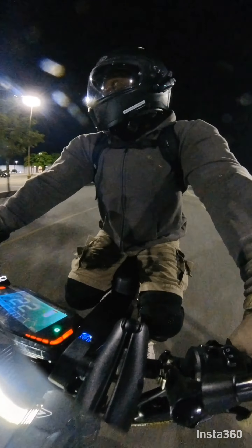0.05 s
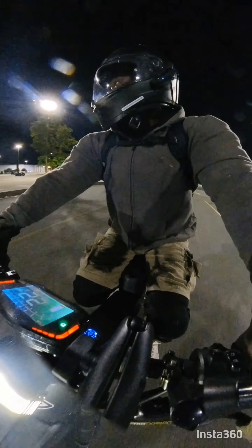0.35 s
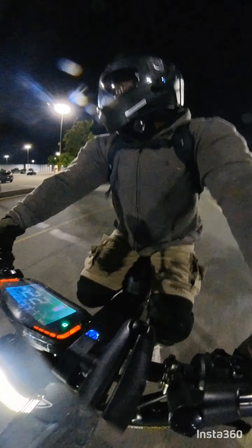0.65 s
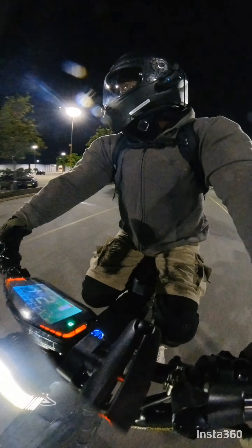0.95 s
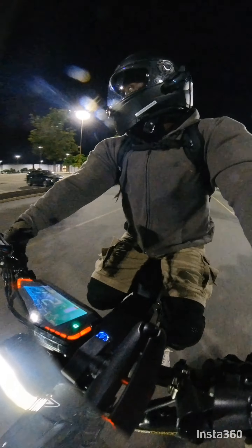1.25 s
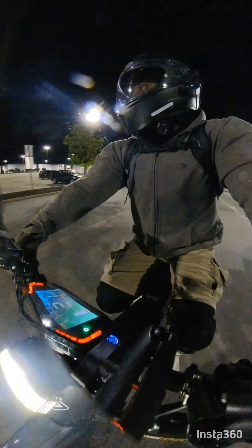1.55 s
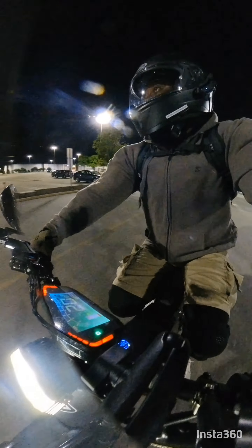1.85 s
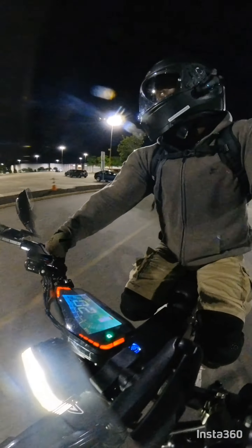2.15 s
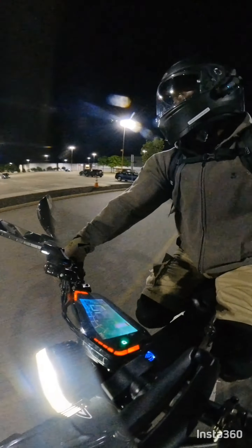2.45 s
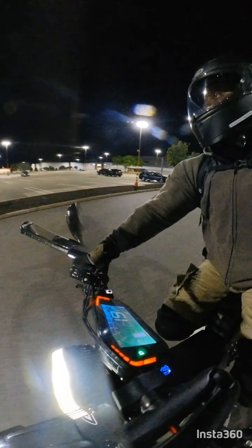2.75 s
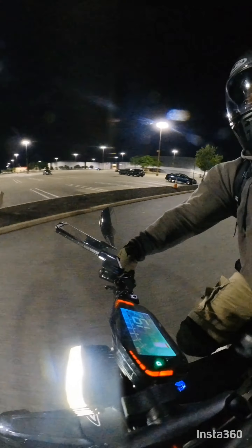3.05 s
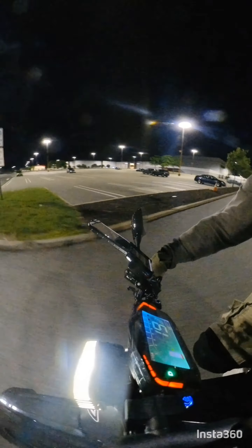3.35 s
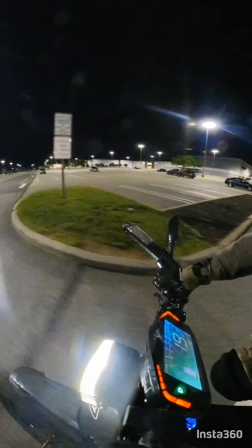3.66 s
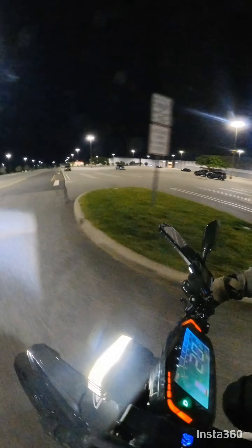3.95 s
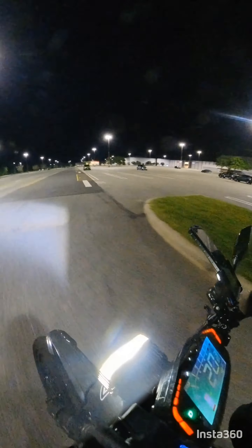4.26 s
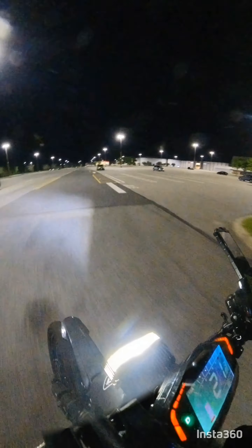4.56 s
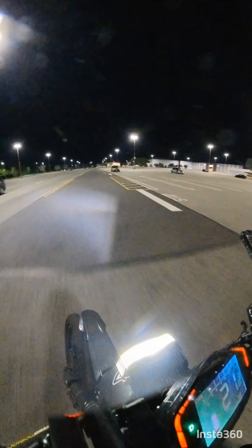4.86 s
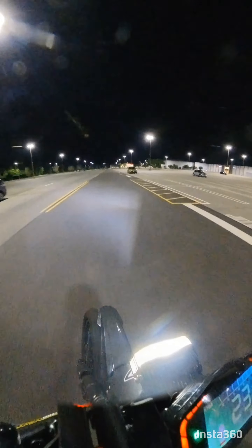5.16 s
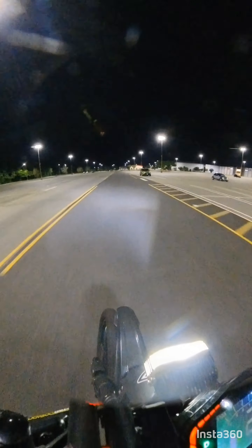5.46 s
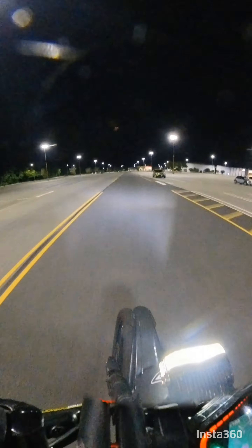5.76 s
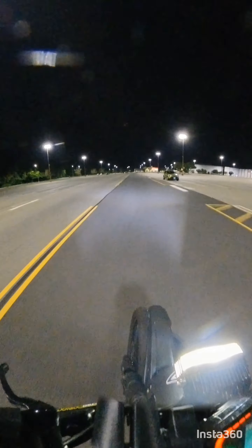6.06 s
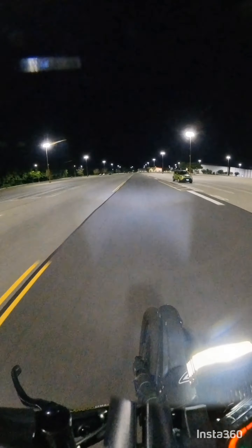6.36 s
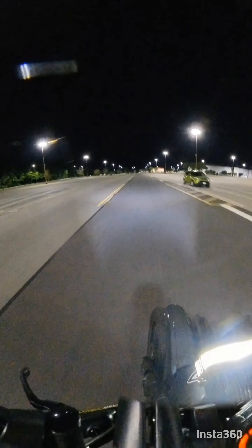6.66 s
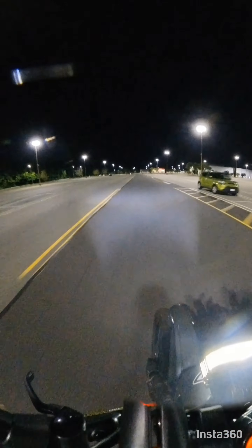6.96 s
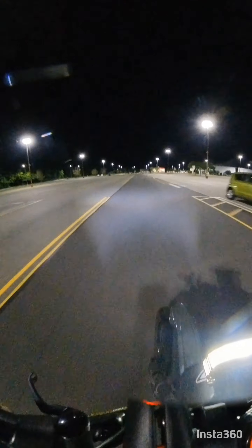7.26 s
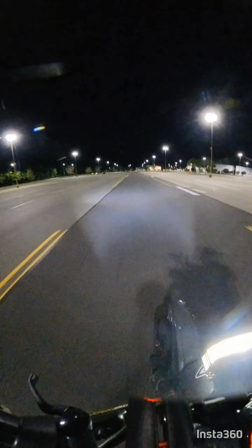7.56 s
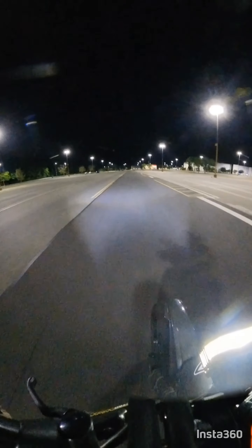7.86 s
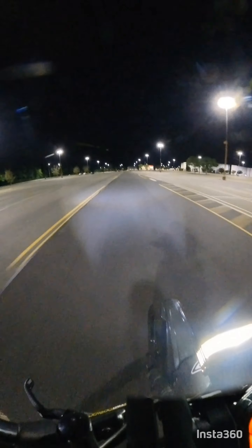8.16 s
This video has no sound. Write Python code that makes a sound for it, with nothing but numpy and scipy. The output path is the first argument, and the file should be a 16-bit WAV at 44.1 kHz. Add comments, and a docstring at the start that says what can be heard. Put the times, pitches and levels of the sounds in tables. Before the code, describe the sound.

Heavy wind rumbles on a handlebar microphone while an electric motorbike rolls along with a low, wavering hum and a dull bump from the road. A sharp double knock ends the coasting, another thump follows, and the bike accelerates, its hum climbing and turning into a rough whine. Loose fittings click lightly along the way, and the rush of tyres and air grows with the speed.

```python
"""Electric motorbike from the handlebar

On an open road, microphone on the handlebar, close to the motor and full in the wind. The motor hums
and ticks as the bike coasts through a bend; the frame takes two hard knocks; a second later the drive
pulls and rises in a rough whine. Thumps and rattles come up from the road, and wind buffets the
microphone over the rush of tyres and air."""
import sys
import numpy as np
from scipy import signal
from scipy.fft import rfft, irfft, next_fast_len
from scipy.io import wavfile
from scipy.ndimage import uniform_filter1d

SR = 44100
rng = np.random.default_rng(int(sys.argv[2]) if len(sys.argv) > 2 else 0)


def bounce(signal):
    """Save signal as a 16-bit WAV file at the path given by the first command-line argument."""
    frames = np.transpose(np.atleast_2d(signal))
    limited = np.clip(frames, -1, 1)
    pcm = np.round(limited * 32767).astype(np.int16)
    wavfile.write(sys.argv[1], SR, pcm)


N = 362502
TIME = np.arange(N) / SR
DRAG_ENDS_S, PULL_STARTS_S, CRUISE_HZ = 2.84, 3.88, 160

# Levels in the tables are relative; each source sets its own gain.
# motor speed as the pitch of its hum: t/s, f/Hz
HUM_PITCH = [(0, 133), (.75, 129.8), (1, 126.2), (1.75, 122.7), (2, 120.6), (2.5, 117.1), (3.25, 117.9),
             (3.5, 116.3), (3.75, 117), (4.25, 130.6), (4.5, 132.2), (4.75, 147.6), (5.75, 194.8),
             (6.25, 213.8), (7, 243.2), (7.5, 258.3), (8.22, 289)]
# drag on the coasting motor, twice easing abruptly: t/s, level/dB
COASTING_DRAG = [(0, 1), (0.585, 1.5), (0.61, -19), (0.73, -14), (0.79, -11.5), (1.1, -2), (1.56, -3),
                 (1.62, -11), (1.85, -11), (2.25, -23), (2.62, -15.5), (2.78, -12)]
# coasting overtones: multiple of the hum, level/dB
DRAG_OVERTONES = [(2.5, 0.5), (4, 1), (4.5, -18.5), (5, -2), (5.5, -3.5), (6, -6), (6.5, -11.5), (7, -13.5),
                  (9, -19.5)]
# wavers in the motor tone: t/s, half length/s, hum/dB, octave/dB, third order/dB
TONE_WAVERS = [(.79, 0.14, -5, 2.5, -10), (1.8, 0.48, 2, 2, 9), (2.67, 0.13, -0.5, 5, 5),
               (2.9, 0.09, -31.5, -2, 4), (3.15, .15, -1, 3, -5.5), (3.45, 0.13, 0, -7.5, 3),
               (3.73, 0.099, -9, -0.5, 1.5), (4.3, 0.2, -7.5, 3.5, 1), (6.38, 0.065, -0.5, -14, 4),
               (6.65, 0.11, 3, 6, 2.5)]
# chassis resonances that the low orders sweep through: f/Hz, width/Hz, level/dB
CHASSIS_MODES = [(119.7, 5.1, 1), (131.9, 1.7, -4), (157.3, 14, -5.5), (220.5, 14.7, -12), (251, 1, -18.5),
                 (387.5, 17, -2), (480, 49, -22.5), (700, 8.3, -1.5)]
# response of the motor casing: f/Hz, level/dB
CASING_RESPONSE = [(300, -4), (390, 2), (415, -3), (455, 2), (505, -2), (560, 3), (605, 2.5), (640, 9),
                   (660, 0), (688, 1.5), (750, -16), (840, -10.5), (900, -1.5), (1000, -2.5), (1110, 0),
                   (1320, -4), (1700, 1), (1950, -4.5), (2280, -0.5), (3000, -10)]
# load on the drive, heard as whine: t/s, level/dB
DRIVE_LOAD = [(0, -75.5), (4, -64.5), (5.5, -54.5), (6.25, -48.5), (6.55, -43.5), (7.2, -41.5),
              (7.7, -39.5), (8.22, -40)]
# whine orders, some in beating pairs: multiple of the hum, level/dB, width/Hz, steady share of power
WHINE_ORDERS = [(1.06, 10, 22, 0.2), (1.96, 5, 9.2, 1), (2.03, 0, 14, 0.3), (2.85, -1.5, 12, 0.7),
                (3.02, -3, 15, 0.4), (3.9, -7, 18, 0.5), (4.07, -5.5, 13, 0.7), (4.9, -14, 35, 0.3),
                (6.15, -14.5, 22, 0.4), (7.2, -18, 20, 0.2), (8.25, -17, 22, 0.25), (9.1, -18.5, 36, 0.05),
                (10, -21, 83, 0.05)]
# shrill order and its smeared sidebands: multiple of the hum, level/dB, width/Hz
SHRILL_CLUSTER = [(26.2, -10.5, 200), (29.3, -1, 92), (30.6, -3.5, 230), (31.8, -9.5, 350)]
# spectrum of the meshing rasp: f/Hz, level/dB
RASP_SPECTRUM = [(400, -17.5), (650, 9.5), (780, 2), (1000, 8.5), (1500, -6.5), (1950, -5.5), (2300, -4.5),
                 (2750, -10.5), (3200, -17.5), (6000, -41.5)]
# knocks on the frame: t/s, level/dB, contact/s, thud/dB, blow f/Hz, blow width/Hz, rebound/dB
FRAME_KNOCKS = [(2.8042, -10.5, 0.0028, -17, 630, 450, -32), (2.9335, -4.5, 0.0042, -9, 655, 220, -9)]
# parts chattering at a knock: delay/s, level/dB
CONTACT_CHATTER = [(0, 6), (.004, -3), (.007, -16), (.013, -11), (.019, -17)]
# spectrum of a knock's first contact: f/Hz, level/dB
CRACK_SPECTRUM = [(400, 12.5), (1000, 23.5), (1700, 4.5), (2300, 8), (3100, 5.5), (3800, 7), (4700, -7),
                  (5600, 0), (6800, 2), (8000, -3), (9200, 4.5), (11500, -11)]
# ringing modes of the frame: f/Hz, level/dB, t60/s
FRAME_MODES = [(416, -6, 0.057), (566, -1, 0.017), (653, -21, 0.15), (667, -29, 0.017), (1020, -24, 0.084),
               (1095, -44, 0.0387), (1640, -21, 0.025)]
# jolts through the fork: t/s, level/dB
FORK_JOLTS = [(0.587, -7), (2.651, -32), (3.801, -16.5)]
# clicks of loose fittings: t/s, level/dB
FITTING_CLICKS = [(.067, -43), (.573, -44), (.584, -46), (0.608, -42), (.803, -40), (1.03, -48),
                  (1.561, -42.5), (1.595, -48), (2.343, -46), (2.59, -49.5), (2.719, -41), (3.178, -40.5),
                  (3.45, -50), (3.522, -47), (4.061, -43), (4.099, -44.5), (4.141, -46), (4.221, -47),
                  (4.291, -46), (4.361, -45), (4.811, -37.5), (5.026, -41), (5.912, -37)]
# gusts and lulls at the microphone: t/s, half length/s, level/dB
WIND_GUSTS = [(.2, 0.21, -1), (.605, 0.027, 5.5), (.71, 0.062, -2), (1.4, 0.41, -2.5), (2.05, 0.36, -1.5),
              (3.79, 0.06, 6.5), (5.2, 0.26, -1)]
# resonances of the microphone mount: f/Hz, width/Hz, level/dB
MOUNT_MODES = [(27.43, 10, -7.5), (73.67, 7.9, -2)]
# spectrum of eddies on the microphone: f/Hz, level/dB
BUFFET_SPECTRUM = [(15, -33), (24, -14.5), (38, -9.5), (55, 0.5), (72, -17.5), (95, -8), (118, 0.5),
                   (160, -5), (200, -7), (270, -14), (340, -24.5), (600, -44.5), (1200, -70.5)]
# spectrum of the rush of tyres and air: f/Hz, level/dB
RUSH_SPECTRUM = [(100, -26), (200, 2.5), (310, 0.5), (395, 5), (470, -2.5), (690, -2.5), (790, -13),
                 (1000, -15), (1200, -18), (1450, -21), (1600, -28), (2200, -41.5), (3000, -45),
                 (6000, -76.5)]
# spectrum of the hiss above it: f/Hz, level/dB
HISS_SPECTRUM = [(500, -5.5), (1500, 9.5), (2400, 6), (3200, 0), (3800, 1.5), (5200, -2), (6800, 0),
                 (8400, 3), (9500, -1.5), (11500, -10)]


def motor(hum_hz, phase, drag):
    """Low orders swell across chassis resonances, shaken slightly by the road; drag adds overtones."""
    hum_db, octave_db, third_db = [swells(TONE_WAVERS, column) for column in range(3)]
    hum = from_db(-15.5 + hum_db + 0.54 * drift(26)) * chassis_gain(hum_hz) * np.sin(phase)
    octave = from_db(octave_db + 1.8 * drift(18)) * np.sin(2 * phase + 0.22 * drift(20))
    octave_push = from_db(-26 + 11.5 * until(PULL_STARTS_S)) + from_db(26.5) * drag
    octave *= octave_push * chassis_gain(2 * hum_hz)
    third = from_db(third_db + 2.2 * drift(15)) * np.sin(3 * phase + 0.35 * drift(15))
    third *= np.hypot(from_db(-41) * chassis_gain(3 * hum_hz), from_db(3.5) * drag)
    overtones = 0
    for order, db in DRAG_OVERTONES:
        gain = from_db(db + 2.2 * drift(13)) * casing_gain(order * hum_hz)
        overtones += gain * np.sin(order * phase + 0.7 * drift(5.5))
    return np.sqrt(2) * (hum + octave + third + drag * overtones)


def whine(hum_hz, phase, drag, load, shrill_full_hz=265):
    """Uneven meshing roughens the drive's orders and rasps between them; a shrill one grows with speed."""
    mesh = 0
    for order, db, width_hz, steady in WHINE_ORDERS:
        clean = np.sqrt(2 * steady) * np.sin(order * phase)
        rough = np.sqrt(1 - steady) * rough_line(order * phase, width_hz)
        mesh += from_db(db) * casing_gain(order * hum_hz) * (clean + rough)
    rasp_gain = from_db(-1.5) * load + from_db(-13.5) * drag
    rasp = rasp_gain * turbulence(RASP_SPECTRUM, patchy_db=1.5, flutter_hz=21)
    shrill = sum(from_db(db) * rough_line(order * phase, width) for order, db, width in SHRILL_CLUSTER)
    shrill_db = -52 - 0.8 * np.maximum(shrill_full_hz - hum_hz, 0) + 3.1 * drift(57)
    return load * mesh + rasp + from_db(shrill_db) * rms_one(shrill)


def controller_whistle():
    """The controller whistles faintly, a little louder while the motor drags."""
    level_db = -76 + 1.5 * until(DRAG_ENDS_S) + drift(8)
    return from_db(level_db) * rms_one(band(rng.standard_normal(N), 8550, 9000))


def ticking(phase):
    """One thin tick every second cycle of the hum while the motor drags."""
    ticks = np.diff(np.floor(phase / (4 * np.pi)), prepend=0)
    strength = drag_gain(-30, follows=0.13) * from_db(1.7 * rng.standard_normal(N))
    return band(ticks * strength, 7600, 9700)


def knocks():
    """A bright, chattering contact, then a double blow that rings the frame, rebounds lower and thuds."""
    crackle = turbulence(CRACK_SPECTRUM, patchy_db=2.5, flutter_hz=17)
    blows, impacts = 0, 0
    for start, db, contact_s, thud_db, blow_hz, width_hz, rebound_db in FRAME_KNOCKS:
        chatter = sum(from_db(contact_db) * burst(start + delay, 0.3 * contact_s)
                      for delay, contact_db in CONTACT_CHATTER)
        crack = from_db(db - 21.5) * (chatter + from_db(-16) * burst(start, 0.0073)) * crackle
        blow = from_db(db) * (np.arange(N) == round((start + 0.002 + contact_s / 2) * SR))
        second_blow = from_db(-5) * np.roll(blow, round(SR / blow_hz))
        blows += resonance(blow + second_blow, blow_hz, width_hz)
        rebound = from_db(rebound_db) * thump(start + 0.0105, hz=470, decay_s=0.00086)
        thud = from_db(thud_db) * thump(start + 0.013, hz=116, decay_s=0.0035)
        impacts += crack + rebound + thud
    return impacts + sum(from_db(db + 4.5) * ring(blows, hz, t60) for hz, db, t60 in FRAME_MODES)


def fork_thumps():
    """Each jolt sends one dull thump up the fork."""
    return sum(from_db(db) * thump(start, hz=73.4, decay_s=0.013) for start, db in FORK_JOLTS)


def rattles(pace, grains_per_s=70, grain_decay_s=0.0034):
    """Loose fittings click over bumps; road grit patters in faint flurries, harder with speed."""
    clicks = sum(from_db(db - 12) * burst(start, 0.0022) for start, db in FITTING_CLICKS)
    hits = rng.random(N) < grains_per_s * from_db(2 * drift(3)) / SR
    grains = hits * from_db(-58.5 + 8 * pace + 2.6 * rng.standard_normal(N))
    grit = signal.lfilter([1], [1, -np.exp(-1 / (grain_decay_s * SR))], grains + 1e-18)
    fittings = band(clicks * rng.standard_normal(N), 1500, 6900)
    return fittings + band(grit * rng.standard_normal(N), 2800, 5000)


def wind_buffet(hum_hz, pace, gust_db, full_hz=136.4):
    """Eddies pound the microphone; the faster the ride, the more of that goes into rocking its mount."""
    level_db = -21 - 0.214 * np.maximum(full_hz - hum_hz, 0) + gust_db
    rocking = sum(from_db(db) * rough_line(2 * np.pi * hz * TIME, width) for hz, width, db in MOUNT_MODES)
    eddies = turbulence(BUFFET_SPECTRUM, patchy_db=1.8, flutter_hz=30)
    return from_db(level_db) * (from_db(4.4 * pace) * rocking + from_db(-1.5 - 2.4 * pace) * eddies)


def road_rush(pace, gust_db, drag, load, gust_share=0.29):
    """Tyres and air rush and hiss behind it all, growing with speed, gusts and strain on the drive."""
    hiss = turbulence(HISS_SPECTRUM, patchy_db=1.2, flutter_hz=60)
    hiss_strain = from_db(-23.5) * drag + from_db(-11.5) * load
    hiss *= np.hypot(from_db(-66 + 8 * pace + gust_share * gust_db), hiss_strain)
    rush = turbulence(RUSH_SPECTRUM, patchy_db=1.13, flutter_hz=18)
    rush_strain = from_db(7.5) * drag + from_db(1.5) * load
    rush *= np.hypot(from_db(-35.5 + 4.5 * pace + gust_share * gust_db), rush_strain)
    return rush + hiss


def chassis_gain(pitch_hz):
    """How strongly the chassis radiates a tone of this pitch."""
    power = sum(from_db(db) ** 2 / (1 + (2 * (pitch_hz - hz) / width) ** 2)
                for hz, width, db in CHASSIS_MODES)
    return np.sqrt(power)


def casing_gain(pitch_hz):
    """How strongly the motor casing radiates an overtone of this pitch."""
    return from_db(np.interp(pitch_hz, *np.transpose(CASING_RESPONSE)))


def drag_gain(level_db, follows):
    """Gain that follows a share of the drag's swings in dB and stops when the drag lets go."""
    return from_db(level_db + follows * in_time(COASTING_DRAG)) * until(DRAG_ENDS_S)


def turbulence(spectrum, patchy_db, flutter_hz):
    """Coloured noise whose octaves flutter partly together, partly alone; rms 1."""
    points_hz, points_db = np.transpose(spectrum)
    size = next_fast_len(N)
    octave = np.log2(np.maximum(np.arange(size // 2 + 1) * SR / size, 1))
    colour = from_db(np.interp(octave, np.log2(points_hz), points_db, left=-120, right=-120))
    noise = rfft(rng.standard_normal(size)) * colour
    together, mix = drift(flutter_hz), 0
    for centre in range(int(np.log2(points_hz[0])), int(np.log2(points_hz[-1])) + 2):
        part = irfft(noise * np.maximum(1 - np.abs(octave - centre), 0), size)[:N]
        mix += part * from_db(patchy_db * (together + drift(flutter_hz)))
    return rms_one(mix)


def rough_line(phase, width_hz):
    """A tone whose strength and phase wander, smearing it into a narrow band; rms 1."""
    return drift(width_hz) * np.sin(phase) + drift(width_hz) * np.cos(phase)


def drift(rate_hz):
    """Smooth random wander of rms 1 that changes at about this rate."""
    step, settle = 20, 4000
    pole = np.exp(-2 * np.pi * step * rate_hz / SR)
    noise = rng.standard_normal(N // step + settle + 2)
    slow = signal.lfilter([1], [1, -2 * pole, pole * pole], noise)[settle:]
    return np.interp(np.arange(N) / step, np.arange(len(slow)), rms_one(slow))


def burst(start, decay_s):
    """Envelope of a contact that swells quickly and dies."""
    age = np.clip((TIME - start) / decay_s, 0, 60)
    return age * np.exp(1 - age)


def thump(start, hz, decay_s):
    """A heavily damped swing of a few cycles."""
    return burst(start, decay_s) * np.sin(2 * np.pi * hz * (TIME - start))


def ring(x, hz, t60):
    """A unit click sets a sine of height 1 ringing."""
    pole, angle = from_db(-60 / (t60 * SR)), 2 * np.pi * hz / SR
    return signal.lfilter([0, np.sin(angle)], [1, -2 * pole * np.cos(angle), pole * pole], x + 1e-18)


def resonance(x, hz, width_hz):
    """A resonant peak with gain 1 on top."""
    pole = np.exp(-np.pi * width_hz / SR)
    feedback = [1, -2 * pole * np.cos(2 * np.pi * hz / SR), pole * pole]
    return signal.lfilter(np.array([1, 0, -1]) * (1 - pole * pole) / 2, feedback, x + 1e-18)


def band(x, low_hz, high_hz):
    """Butterworth band-pass."""
    return signal.sosfilt(signal.butter(2, [low_hz, high_hz], "band", fs=SR, output="sos"), x + 1e-18)


def swells(rows, column=0):
    """Sum of smooth rises and dips, in dB, from one level column of a table."""
    return sum(levels_db[column] * np.exp(-((TIME - centre) / half_length) ** 2)
               for centre, half_length, *levels_db in rows)


def until(end_s, fade_s=0.1):
    """1 before this moment, fading to 0 across it."""
    return np.clip(0.5 + (end_s - TIME) / fade_s, 0, 1)


def in_time(rows):
    """A curve's value at every sample."""
    return np.interp(TIME, *np.transpose(rows))


def from_db(db):
    """Decibels to gain."""
    return 10 ** (np.asarray(db) / 20)


def rms_one(x):
    """Scale to unit rms."""
    return x / np.sqrt(np.mean(x ** 2) + 1e-20)


def scene():
    """Mono at the handlebar: one motor speed turns the drive and sets the wind; the frame knocks."""
    hum_hz = in_time(HUM_PITCH)
    phase = 2 * np.pi * np.cumsum(hum_hz) / SR
    pace = np.log2(hum_hz / CRUISE_HZ)   # octaves above cruising speed
    drag, load = drag_gain(-42.5, follows=0.81), from_db(in_time(DRIVE_LOAD))
    gust_db = swells(WIND_GUSTS)
    chassis = knocks() + fork_thumps() + rattles(pace)
    drive = motor(hum_hz, phase, drag) + whine(hum_hz, phase, drag, load)
    drive += controller_whistle() + ticking(phase)
    air = wind_buffet(hum_hz, pace, gust_db) + road_rush(pace, gust_db, drag, load)
    return (drive + chassis + air)[None]


def record(dry):
    """A fast compressor holds the strongest gusts down; the treble rolls off and the top is cut."""
    threshold_db, ratio, fade_in_s = -18.5, 2.5, 0.003
    rolloff_hz, cutoff_hz = 9800, 13000
    level_db = 10 * np.log10(uniform_filter1d(dry ** 2, size=1100, axis=-1) + 1e-9)
    over_db = uniform_filter1d(np.maximum(level_db - threshold_db, 0), size=500, axis=-1)
    held = dry * from_db((1 / ratio - 1) * over_db) * np.minimum(TIME / fade_in_s, 1)
    dulled = signal.sosfilt(signal.butter(4, rolloff_hz, fs=SR, output="sos"), held)
    return signal.sosfilt(signal.cheby2(14, 60, cutoff_hz, fs=SR, output="sos"), dulled)


dry = scene()
out = record(dry)
bounce(out)
```